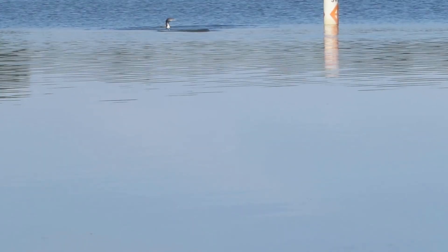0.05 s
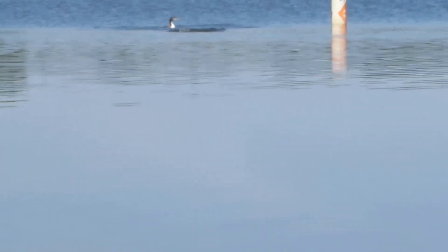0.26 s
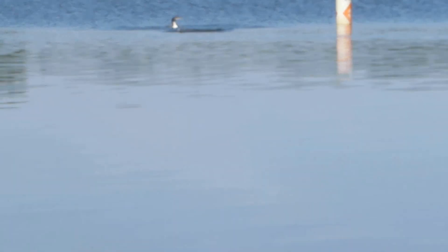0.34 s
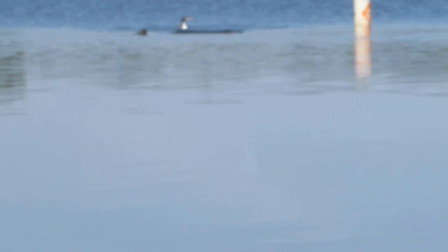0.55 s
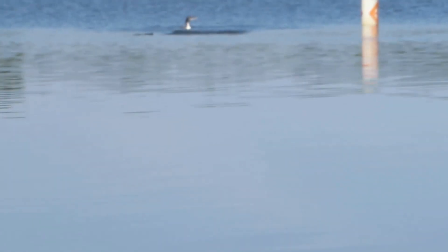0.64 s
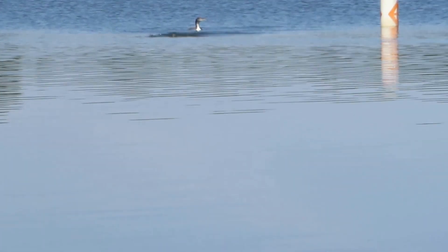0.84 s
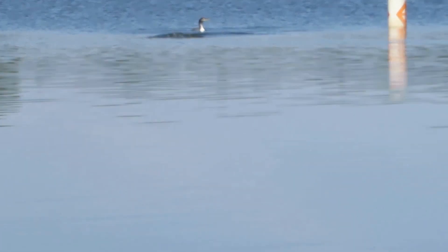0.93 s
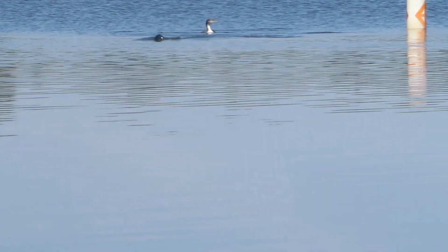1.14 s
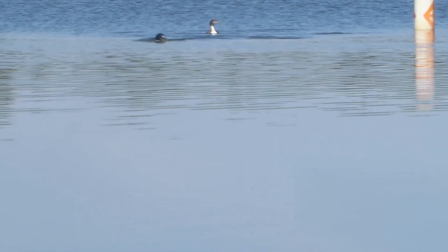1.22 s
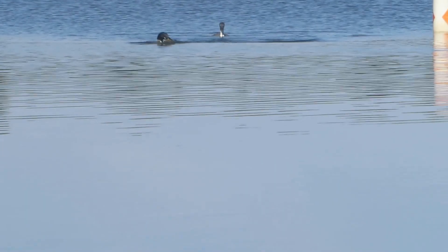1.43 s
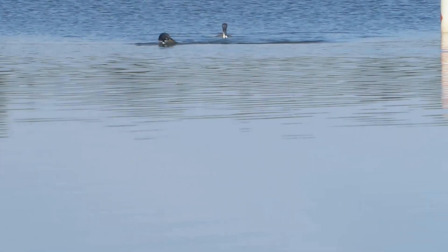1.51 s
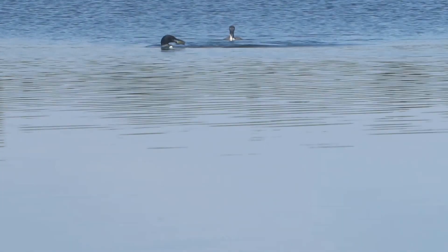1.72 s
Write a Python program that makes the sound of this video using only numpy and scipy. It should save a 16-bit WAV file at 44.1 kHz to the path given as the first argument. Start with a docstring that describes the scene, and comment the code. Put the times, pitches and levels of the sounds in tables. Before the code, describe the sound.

A camera's zoom motor starts with several plastic clicks, whirs with a low throb and thin whine, then clicks off. Heard through the camera's own case, beside a calm lake with soft distant rumble and a faint insect.

```python
"""Camera zoom by a calm lake.

A camera's own microphone hears its zoom through the case. The lever clicks, a small motor whines up,
and the gears engage with a click and throb about 53 times a second until a last click stops them.
Behind it lie a soft distant rumble and the high ticks and buzz of what may be a katydid."""
import sys
import numpy as np
from scipy.fft import rfft, irfft, next_fast_len
from scipy.io import wavfile
from scipy.ndimage import map_coordinates

SR = 44100
rng = np.random.default_rng(int(sys.argv[2]) if len(sys.argv) > 2 else 0)


def log_audio(samples):
    """Write samples as a 16-bit WAV file to the path given in sys.argv[1]."""
    # one column per channel
    frames = np.atleast_2d(samples).T
    # limit to full scale, then quantise
    limited = np.clip(frames, -1, 1)
    pcm = np.round(limited * 32767).astype(np.int16)
    wavfile.write(sys.argv[1], SR, pcm)


N = 77175
TIME = np.arange(N) / SR
MOTOR_ON_S, GEARS_ON_S, ZOOM_OFF_S = 0.2, 0.359, 1.494
CLICK_ATTACK_S = 0.00092
# stereo image of the mechanism's noise: frequency_hz, correlation
MECHANISM_IMAGE = [(100, 0.96), (900, 0.85), (2000, -0.14), (4000, 0.16), (12000, -0.33)]


def amp(db):
    """Decibels to gain."""
    return 10 ** (np.asarray(db) / 20)


def unit(x):
    """Scale to rms 1."""
    return x / np.sqrt(np.mean(x ** 2) + 1e-20)


def along(points, hz):
    """Read a breakpoint curve on a log frequency axis."""
    point_hz, values = np.transpose(points)
    return np.interp(np.log(hz + 1), np.log(point_hz + 1), values)


def curves(rows):
    """One automation curve for each column after the time."""
    times, *columns = np.transpose(rows)
    return [np.interp(TIME, times, column) for column in columns]


def wobble(rate):
    """A smooth random curve, rate knots a second."""
    return map_coordinates(rng.standard_normal(512), [TIME * rate], mode="wrap")


def filtered(x, response):
    """Shape x with a frequency response."""
    size = next_fast_len(N + SR // 2)
    return irfft(rfft(x, size) * response(np.fft.rfftfreq(size, 1 / SR)), size)[..., :N]


def noise(colour, image):
    """Stereo noise of rms 1 with a given colour and left-right correlation."""
    def mid_side(hz):
        angle = np.arccos(np.clip(along(image, hz), -1, 1)) / 2
        return amp(along(colour, hz)) * [np.cos(angle), np.sin(angle)]
    mid, side = filtered(rng.standard_normal((2, N)), mid_side)
    return unit(np.array([mid + side, mid - side]))


def pan(db):
    """Left and right gains of mean 1; positive db leans left."""
    gains = amp([[db / 2], [-db / 2]])
    return gains / gains.mean()


def running(start_s, fade_s=0.0087):
    """A gate, open from start_s until the zoom stops."""
    return np.clip((TIME - start_s) / fade_s, 0, 1) * np.clip((ZOOM_OFF_S - TIME) / fade_s + .5, 0, 1)


def gears(jitter_turns=0.0077, knock_lag_turns=0.274, catch_db=-27, rasp_pulse_db=4):
    """Each turn pushes the case once, then knocks on it; the teeth rub and catch."""
    # gear train: time_s, turns_per_s, hum_db, knock_db (both before trim)
    train = [(.36, 52, -24.5, -20.5), (.41, 50.5, -27, -34.5), (.46, 48, -19.5, -22),
             (.53, 47.7, -19.5, -21.5), (.59, 50.7, -19.5, -20), (.68, 51.5, -18, -21.5),
             (.76, 51, -21, -22), (.84, 56.5, -19.5, -32.5), (.93, 54.3, -21.5, -19),
             (.98, 53.3, -20.5, -30), (1.06, 54.7, -22, -38.5), (1.13, 56, -24, -21.5),
             (1.2, 55, -23, -34.5), (1.29, 55, -23.5, -29.5), (1.36, 55, -24, -37), (1.44, 54, -22, -24.5),
             (1.49, 56, -20.5, -37)]
    # the knock's harmonics 2 to 8 of the turning rate: gain_db
    overtones = [1, -12.5, -16.5, -17, -23, -25, -25.5]
    # rubbing teeth: time_s, level_db
    rasp_levels = [(.2, -44), (.3, -34.5), (.42, -36.5), (.58, -34), (.75, -34), (.92, -31.5), (1.05, -35),
                   (1.27, -39), (1.36, -36), (1.49, -35.5)]
    # colour of the rubbing: frequency_hz, gain_db
    rasp_colour = [(30, -3), (130, 5.5), (300, -5), (550, -11.5), (800, -4.5), (1150, -18), (1750, -13.5),
                   (2300, -28.5), (3100, -26.5), (4200, -40), (7000, -33.5), (14000, -51)]
    # colour of the small tick as the teeth catch: frequency_hz, gain_db
    catch_colour = [(400, -19), (1700, 1.5), (2400, -2), (3100, -2.5), (4500, -17.5), (9000, -10),
                    (14000, -22)]
    rate, hum_db, knock_db = curves(train)
    rasp_db, = curves(rasp_levels)
    engaged = running(GEARS_ON_S)
    turns = np.cumsum(rate * (TIME > GEARS_ON_S)) / SR + jitter_turns * wobble(48.8)
    push = np.cos(2 * np.pi * turns)
    force = amp(knock_db + 0.8 * wobble(44.1))
    knock_phase = 2 * np.pi * (turns - knock_lag_turns)
    knock = force * sum(amp(db) * np.cos(k * knock_phase) for k, db in enumerate(overtones, 2))
    hum = amp(hum_db + 0.4 * wobble(30.2)) * push
    throb = amp(-1) * knock * pan(-8) - amp(0.5) * hum * pan(-9)  # trimmed and set to the right
    catch_pulse = unit(np.exp(2.5 * push))  # one narrow peak a turn
    catch = amp(catch_db) * force * catch_pulse * noise(catch_colour, MECHANISM_IMAGE)
    rasp = amp(rasp_db + rasp_pulse_db * push * engaged) * noise(rasp_colour, MECHANISM_IMAGE)
    return (np.sqrt(2) * throb + catch) * engaged + rasp * running(MOTOR_ON_S)


def clicks(tick_t60_s=0.016, thud_hz=365, thud_t60_s=0.019, rolloff_db_per_octave=5.5, width=0.72):
    """Every click is a dry tick, a low thud and a short ring of the plastic case."""
    # lever and gear hits: start_s, ring_db, tick_db, thud_db, ring_centre_hz, pan_db
    hits = [(0.137, -34.5, -50, -44, 2200, -4), (.2, -15, -18, -28, 1500, -2.5),
            (.254, -31, -24, -33, 2080, -1), (0.296, -26.5, -30, -42, 1700, 4),
            (0.322, -27, -47, -16.5, 505, -2.5), (0.3468, -11.5, -20.5, -13, 2230, 0),
            (.362, -36, -46, -31, 1180, 13), (1.493, -11, -20.5, -20, 1180, -1.5)]
    # resonances of the case: pitch_hz, gain_db, t60_s
    case_modes = [(402, -9, 0.1), (570, -9, 0.054), (781, -1, 0.042), (880, -3.5, 0.044),
                  (1093, -11, 0.039), (1265, -10.5, 0.052), (1521, -4, 0.054), (1692, -4, 0.036),
                  (1890, -1, 0.027), (2226, -11, 0.025), (2890, -16.5, 0.038), (3080, -22, 0.042),
                  (5200, -13, 0.022)]
    # colour of the dry tick: frequency_hz, gain_db
    tick_colour = [(500, 6.5), (2000, 12), (4000, 7), (8000, -2), (11500, 1.5), (15000, -20)]
    out = np.zeros((2, N))
    hz, mode_db, t60_s = np.transpose(case_modes)[:, :, None]
    for start_s, ring_db, tick_db, thud_db, centre_hz, pan_db in hits:
        t = np.maximum(TIME - start_s, 0)
        scatter, onset_phase, spread = rng.standard_normal((3, len(hz), 1))
        first = int(start_s * SR)
        ringing = slice(first, first + SR // 10)
        focus_db = -rolloff_db_per_octave * np.abs(np.log2(hz / centre_hz))
        decay = amp(ring_db + mode_db + focus_db + 0.1 * scatter - 60 * t[ringing] / t60_s)
        click = amp(tick_db - 60 * t / tick_t60_s) * noise(tick_colour, MECHANISM_IMAGE)
        click += amp(thud_db - 60 * t / thud_t60_s) * np.sin(2 * np.pi * thud_hz * t)
        for channel, sign in enumerate((1, -1)):
            phase = np.pi * onset_phase + sign * width * spread * hz / np.median(hz)  # highs ring wider
            click[channel, ringing] += (decay * np.sin(2 * np.pi * hz * t[ringing] + phase)).sum(0)
        out += click * (1 - np.exp(-t / CLICK_ATTACK_S)) * pan(pan_db)
    return out


def lever_plop(start_s=0.2, level_db=-10, from_hz=1800, to_hz=508, fall_s=0.0051, t60_s=0.044):
    """A short, rough ring under the lever's click, dropping in pitch like a plop."""
    t = np.maximum(TIME - start_s, 0)
    cycles = to_hz * t + (from_hz - to_hz) * fall_s * (1 - np.exp(-t / fall_s))
    phase = 2 * np.pi * cycles + 0.38 * wobble(400)
    decay = amp(level_db - 60 * t / t60_s + 2.5 * wobble(400.7))
    return decay * (1 - np.exp(-t / CLICK_ATTACK_S)) * np.sin([phase + 0.49, phase])


def motor(waver_hz=10, flutter_db=1, left_lead_rad=2.09):
    """A thin whine that sags as the motor takes up its load."""
    # whine under load: time_s, pitch_hz, level_db
    whine = [(.2, 6400, -76), (.26, 5910, -69), (.32, 5480, -54), (.37, 5350, -56), (.55, 5270, -56.5),
             (.7, 5253, -54), (.82, 5200, -57), (.93, 5304, -57), (1.18, 5290, -57), (1.32, 5270, -58.5),
             (1.44, 5350, -58), (1.49, 5350, -53)]
    hz, db = curves(whine)
    phase = 2 * np.pi * np.cumsum(hz + waver_hz * wobble(69.25)) / SR
    tone = np.sqrt(2) * np.sin([phase + left_lead_rad, phase])
    return tone * amp(db + flutter_db * wobble(50.5)) * running(MOTOR_ON_S) * pan(2)


def insect(stroke_hz=52.3, depth_db=3, flicker_db=1.1, tick_width_s=0.0055):
    """Rubbed wings: a few separate ticks, a long fast buzz, then ticks again."""
    # wing buzz: time_s, level_db
    buzz_levels = [(0, -53), (.15, -56.5), (.22, -47), (.45, -48), (.7, -46.5), (.8, -52.5), (.98, -53.5),
                   (1.04, -60), (1.15, -57), (1.48, -55), (1.6, -55), (1.75, -50.5)]
    # separate wing ticks: peak_s, level_db
    wing_ticks = [(.002, -43), (.06, -46), (1.51, -50), (1.559, -47.5), (1.618, -45), (1.674, -44),
                  (1.735, -46)]
    # colour of the wings: frequency_hz, gain_db
    wing_colour = [(6000, -32), (9000, -10), (10300, 0.5), (11400, 3), (13000, -1.5), (14200, -2.5),
                   (15000, -15)]
    # their stereo image: frequency_hz, correlation
    wing_image = [(11000, -0.48)]
    buzz_db, = curves(buzz_levels)
    strokes = np.cos(2 * np.pi * stroke_hz * TIME + .4 * wobble(8.8))
    buzz = amp(buzz_db + flicker_db * wobble(44.8)) * unit(amp(depth_db * strokes))
    ticks = sum(amp(db) * np.exp(-.5 * ((TIME - s) / tick_width_s) ** 2) for s, db in wing_ticks)
    return np.hypot(buzz, ticks) * noise(wing_colour, wing_image) * pan(-2)


def lake(air_db=-33, swell_db=0.4, drift_rad=0.81):
    """A steady bed of distant rumble with a faint engine in it."""
    # rumble and air over the lake: frequency_hz, gain_db
    air_colour = [(20, -2), (45, -8), (68, 0), (100, -3), (150, -2.5), (220, -1), (300, -9.5), (420, -9.5),
                  (600, -12.5), (820, -12.5), (1100, -18), (1500, -17.5), (1900, -25), (2400, -31.5),
                  (3500, -35.5), (7000, -38.5), (15000, -50)]
    # their stereo image: frequency_hz, correlation
    air_image = [(60, 0.94), (300, 0.54), (1000, 0.6), (2000, 0.28), (4000, 0), (12000, 0.2)]
    # drone of a far engine: pitch_hz, level_db
    engine_tones = [(69, -39.5), (272, -46.5), (361, -48)]
    bed = amp(air_db + swell_db * wobble(6.6)) * noise(air_colour, air_image)
    for hz, db in engine_tones:
        gain = np.sqrt(2) * amp(db + 2.6 * wobble(5.33))
        bed += gain * np.sin(2 * np.pi * hz * TIME + drift_rad * wobble(7.6))
    return bed * pan(0.6)


def scene():
    """The zoom mechanism close by, the insect and lake behind it."""
    return motor() + gears() + clicks() + lever_plop() + insect() + lake()


def record(dry, top_hz=15100):
    """The camera cuts two narrow dips in the treble and drops the very top."""
    # treble notches: centre_hz, half_width_hz
    notches = [(3930, 160), (7880, 70)]
    def response(hz):
        dips = [(centre**2 - hz**2) / (centre**2 - hz**2 + 2j * hz * half) for centre, half in notches]
        return np.prod(dips, axis=0) * (hz < top_hz)
    return filtered(dry, response)


dry = scene()
out = record(dry)
log_audio(out)
```